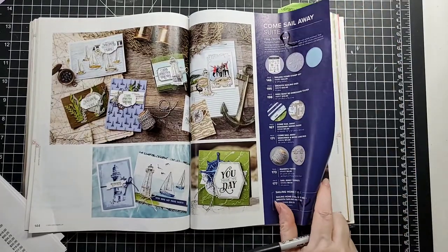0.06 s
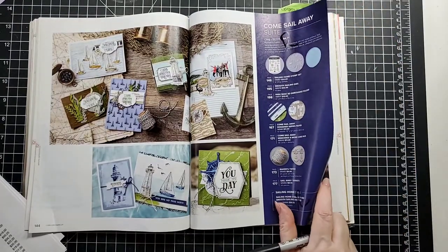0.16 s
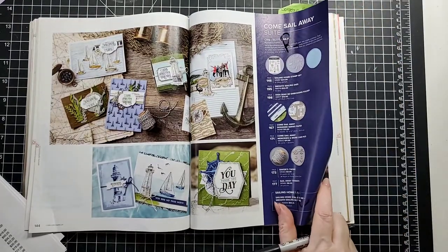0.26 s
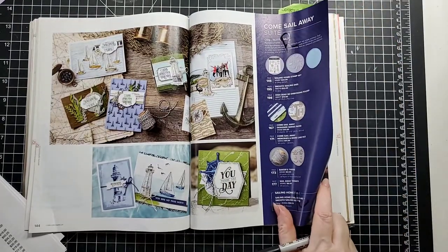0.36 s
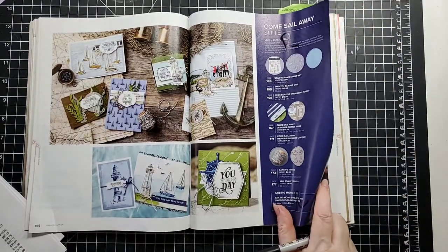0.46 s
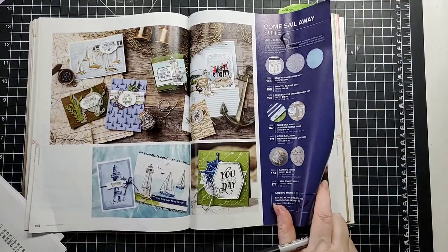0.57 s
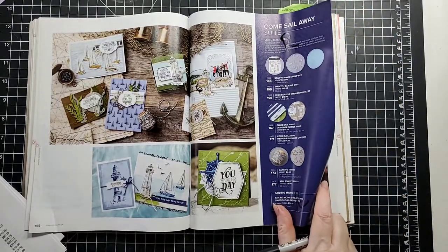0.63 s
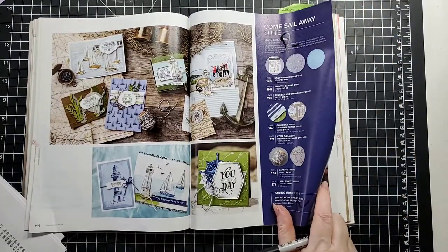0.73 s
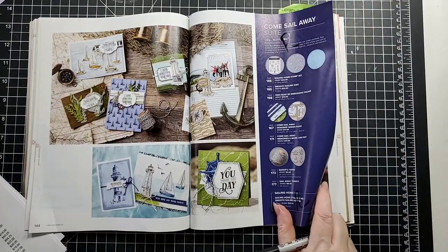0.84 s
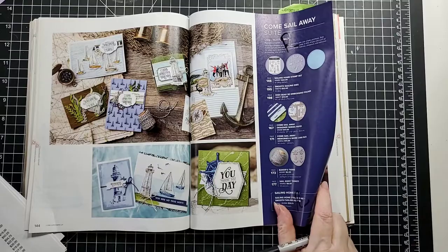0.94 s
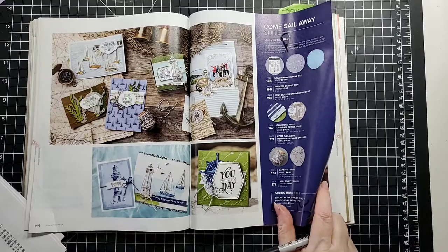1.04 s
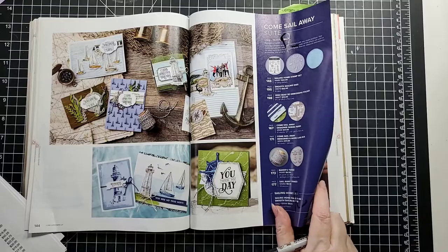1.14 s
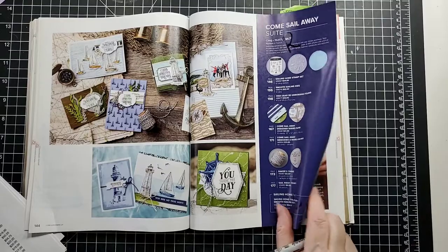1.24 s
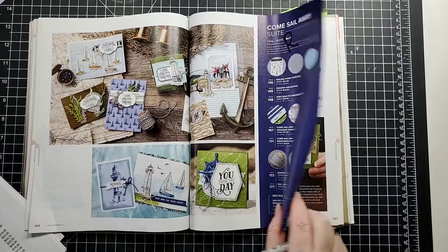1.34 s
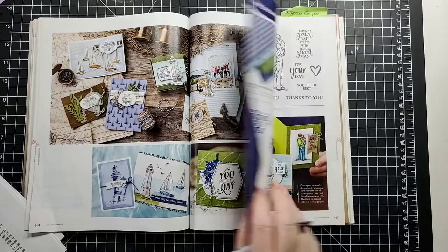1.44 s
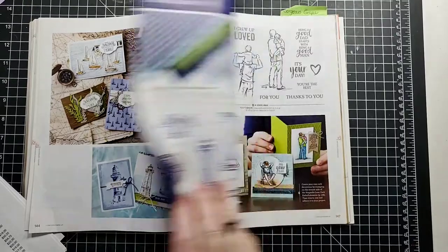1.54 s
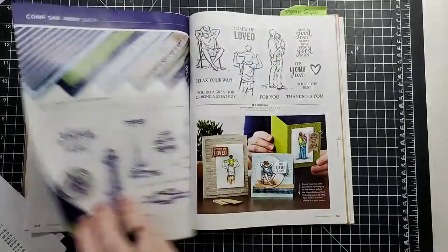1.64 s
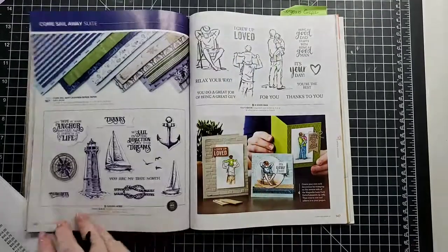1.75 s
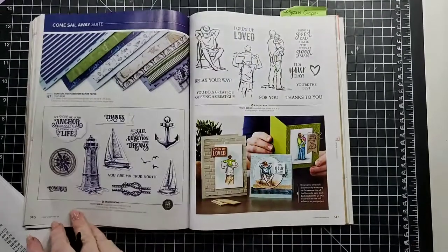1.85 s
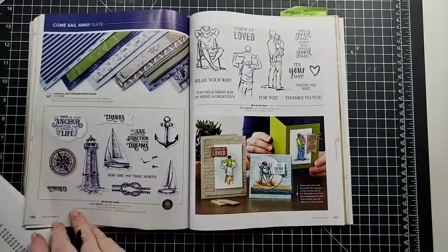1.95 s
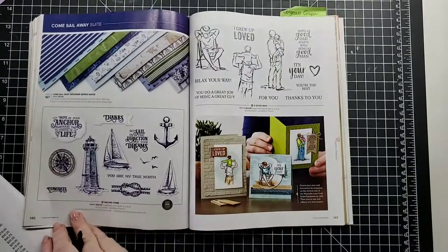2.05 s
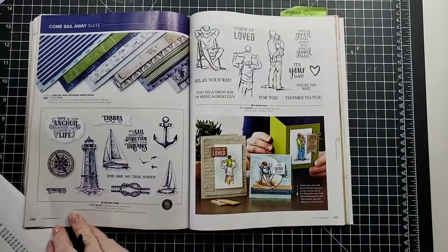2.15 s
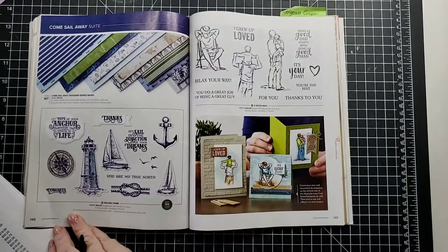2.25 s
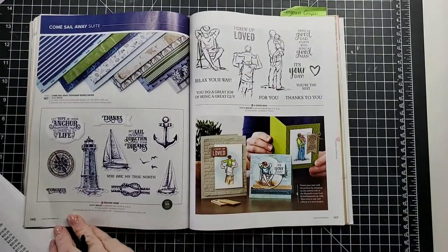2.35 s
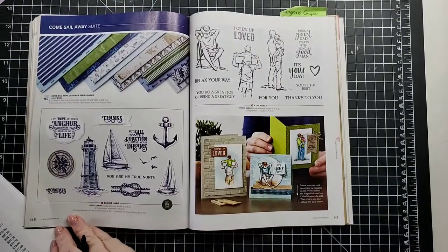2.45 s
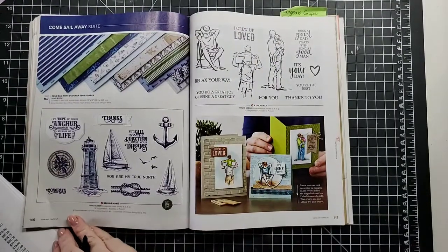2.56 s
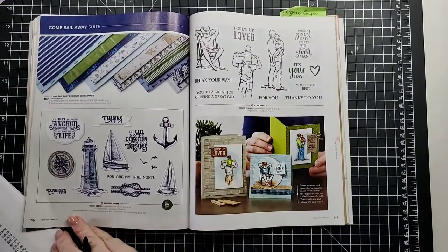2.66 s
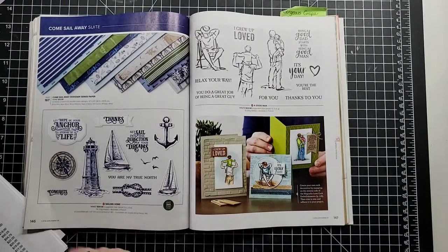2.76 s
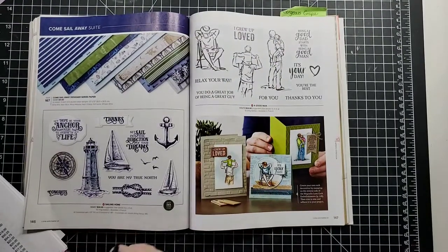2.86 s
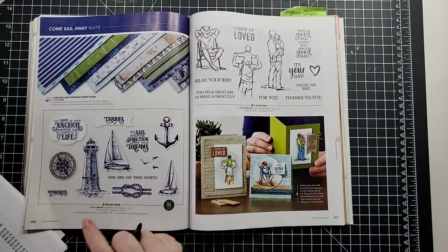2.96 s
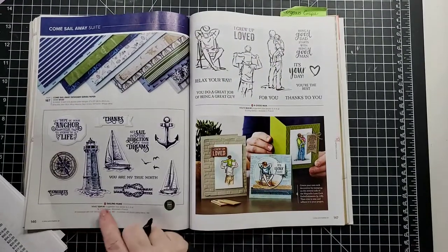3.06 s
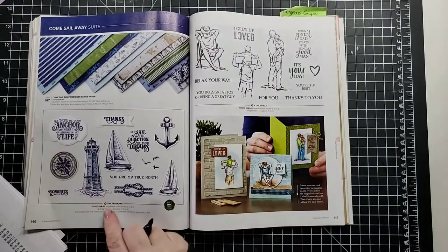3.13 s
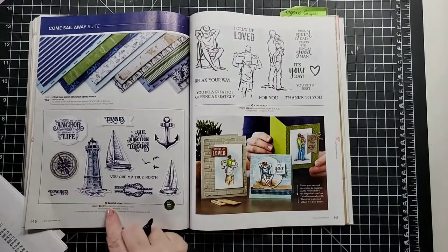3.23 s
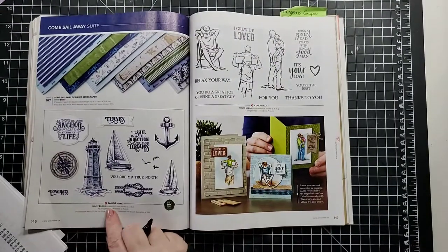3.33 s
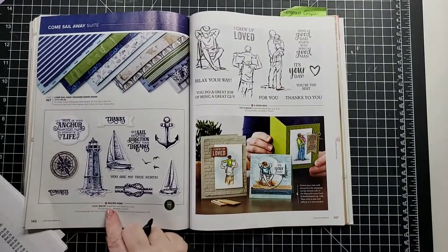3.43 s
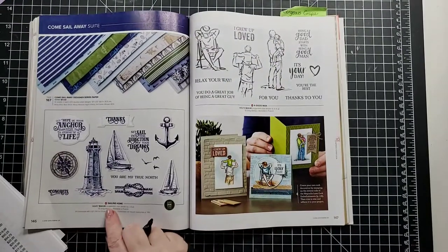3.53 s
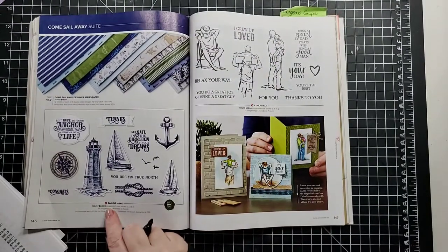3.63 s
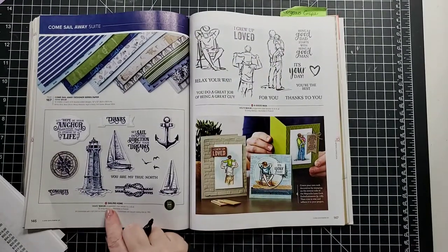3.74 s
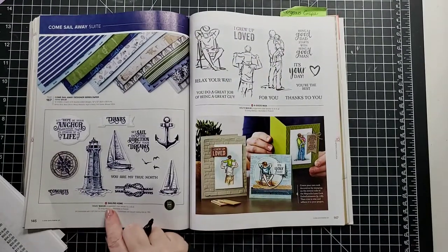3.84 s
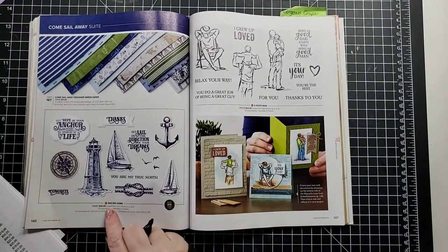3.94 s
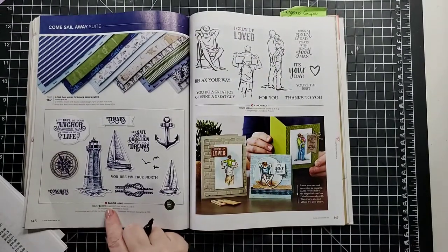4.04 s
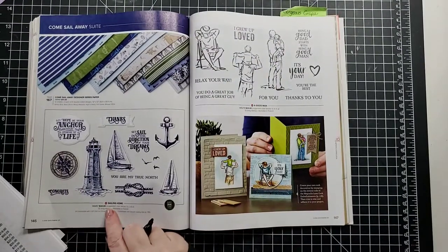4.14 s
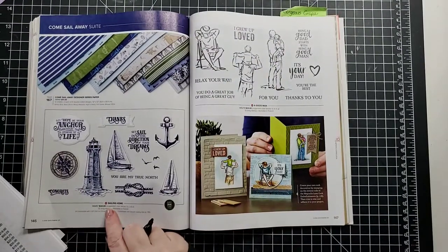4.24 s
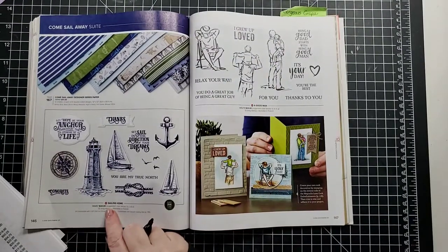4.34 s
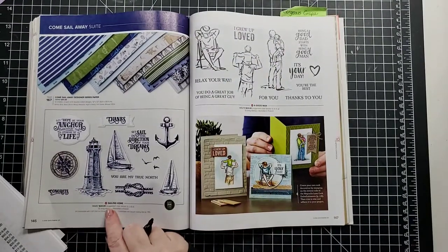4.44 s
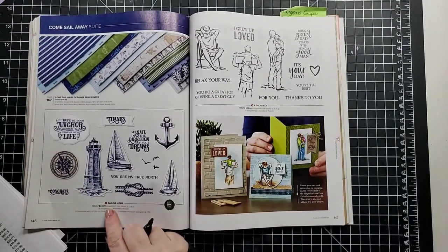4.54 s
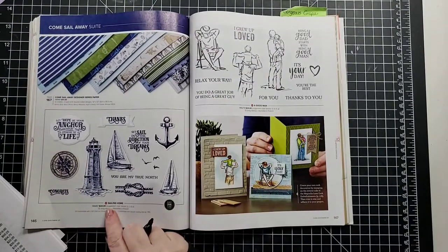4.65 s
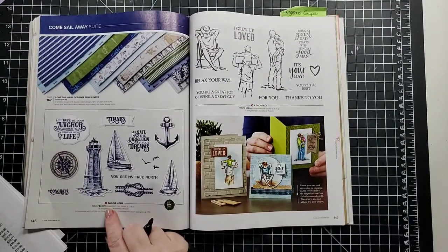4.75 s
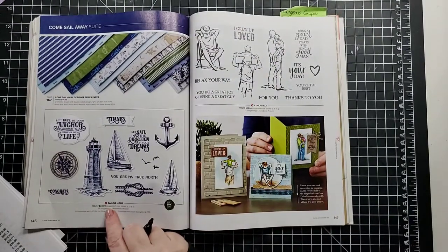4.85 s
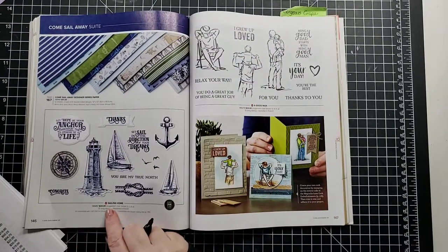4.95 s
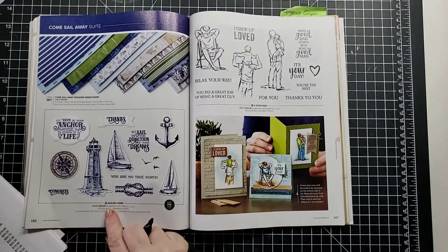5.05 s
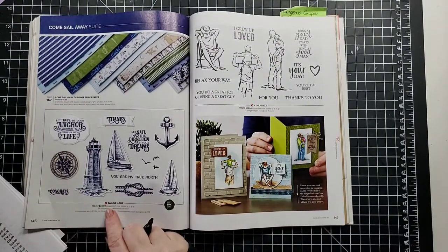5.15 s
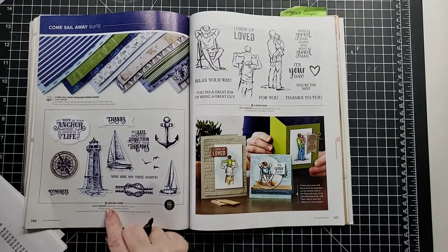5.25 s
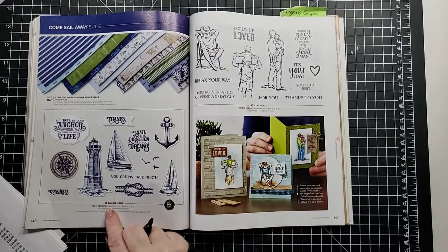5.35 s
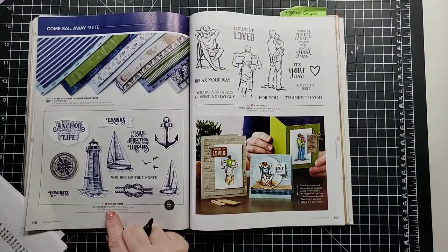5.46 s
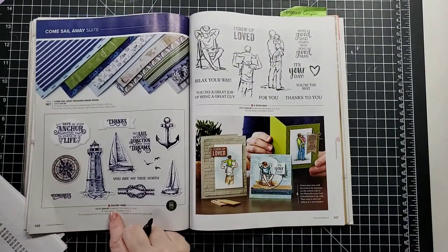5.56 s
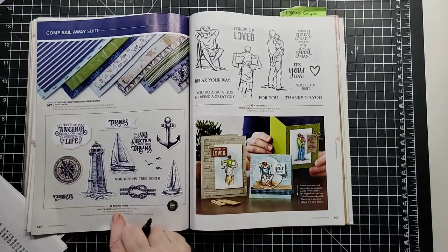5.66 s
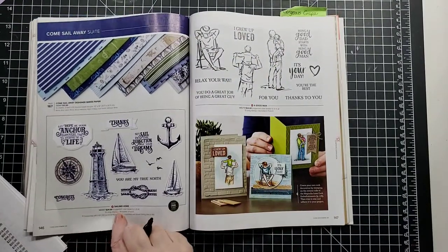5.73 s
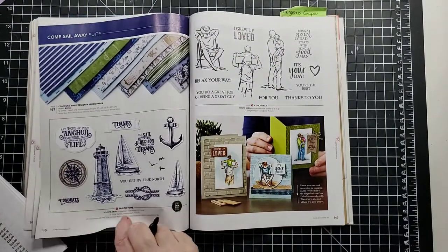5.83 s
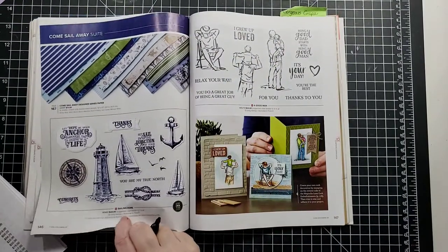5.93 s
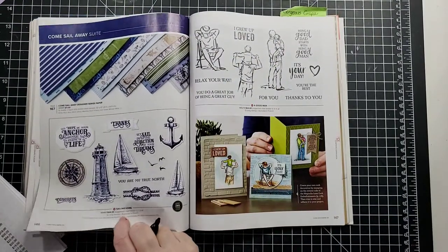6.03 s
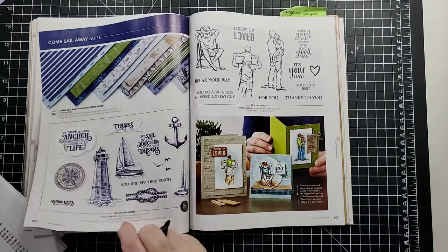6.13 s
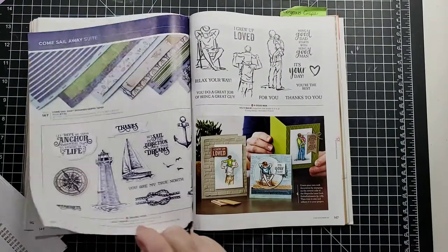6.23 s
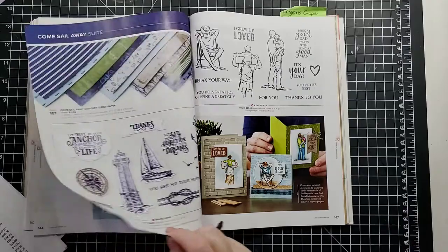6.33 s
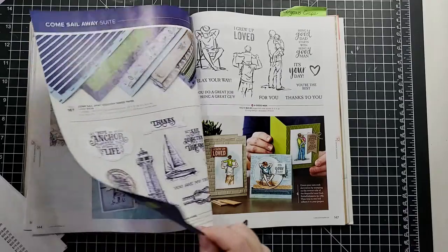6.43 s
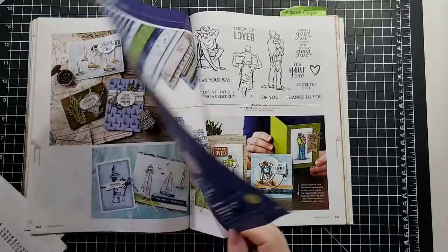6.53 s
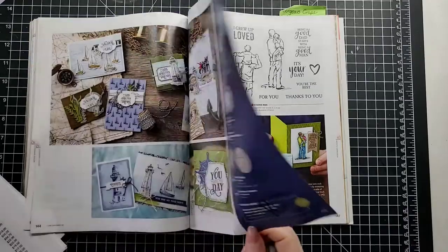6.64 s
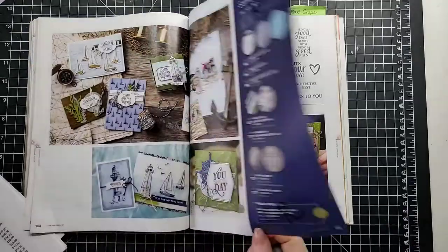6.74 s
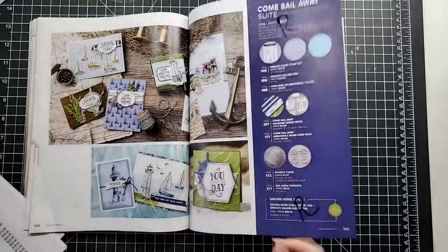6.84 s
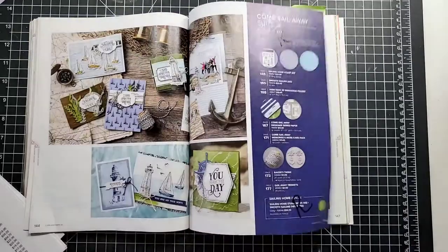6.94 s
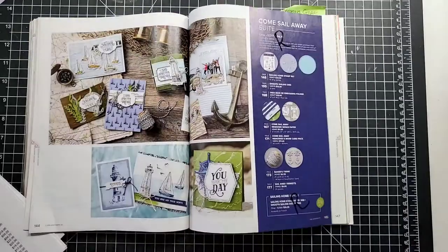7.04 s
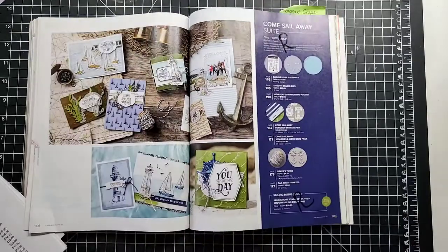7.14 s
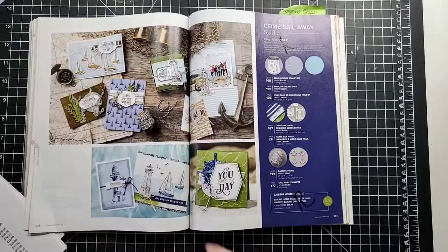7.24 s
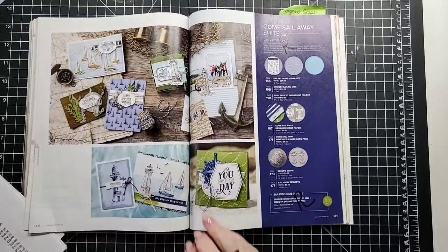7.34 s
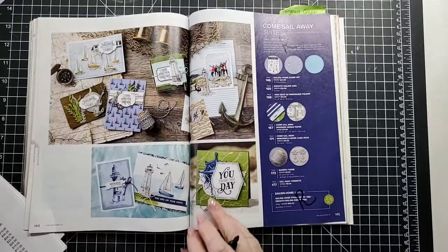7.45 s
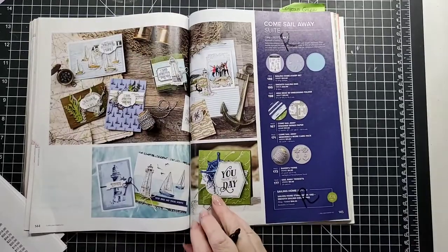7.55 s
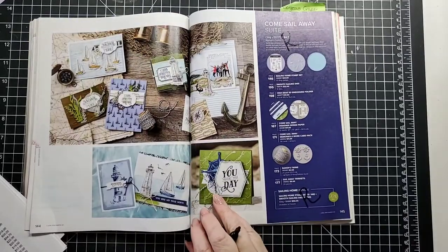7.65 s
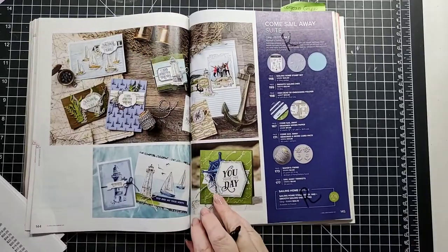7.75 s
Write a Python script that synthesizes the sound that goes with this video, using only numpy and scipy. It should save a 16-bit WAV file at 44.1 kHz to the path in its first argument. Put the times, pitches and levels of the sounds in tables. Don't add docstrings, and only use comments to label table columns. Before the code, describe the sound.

A quiet craft room, heard close from above the table in stereo, with low fan hum and gentle hiss. At 0.1 s a faint page flick; around 0.7-0.8 s a dull distant wooden rub and tiny pen-clip rattle. From 1.2 s a palm slides on glossy paper, with a tick at 1.4 s. At 1.6-1.8 s the sheet whips over: dense crackle, buckling, a gust and the loudest bright slap at 1.7 s, then quick flaps. Soft skin squeaks and smoothing at 2.0-2.1 s, small ticks and wipes from 2.5 to 3.1 s. Near silence follows, broken by a small rattle at 4.7 s. At 5.3-5.8 s fingers rub the edge, with crisp snaps at 5.7 and 5.8 s. Light rustling from 6.0 s, a sharp crack at 6.6 s, then a softer return flap landing near 6.95 s. Brushes fade by 7.5 s, ending with a faint rattle.

```python
import sys
import numpy as np
from scipy import signal
from scipy.fft import rfft, irfft, next_fast_len
from scipy.io import wavfile
from scipy.ndimage import uniform_filter1d, map_coordinates

SR = 44100
rng = np.random.default_rng(int(sys.argv[2]) if len(sys.argv) > 2 else 0)


def voltage_ratio(level):
    return 10 ** (np.asarray(level, float) / 20)


def master_out(mix):
    frames = np.transpose(np.atleast_2d(mix))
    ceiling = np.clip(frames, -1, 1)
    pcm = np.round(ceiling * 32767).astype(np.int16)
    wavfile.write(sys.argv[1], SR, pcm)


N = 343450


def evened(x):
    return x / np.sqrt(np.mean(x ** 2) + 1e-20)


def read(points, hz):
    f, value = np.transpose(points)
    return np.interp(np.log(hz + 1), np.log(f + 1), value)


def add(mix, s, sound):
    part = mix[..., round(s * SR):][..., :sound.shape[-1]]
    part += sound[..., :part.shape[-1]]


def panned(sound, pan_db):
    return sound * voltage_ratio(np.array([[.5], [-.5]]) * pan_db)


def coloured(x, gain):
    size = next_fast_len(x.shape[-1])
    return irfft(rfft(x, size) * gain(np.fft.rfftfreq(size, 1 / SR)), size)[..., :x.shape[-1]]


def resonate(x, hz, width):
    turn = np.exp(2j * np.pi * hz * np.arange(len(x)) / SR)
    r = np.exp(-np.pi * width / SR)
    return 2 * (turn * signal.lfilter([(1 - r) ** 2], [1, -2 * r, r * r], x / turn)).real


def stroke(t, s, rise, fall, bend=1):
    away = np.maximum((s - t) / max(rise, .004), (t - s) / max(fall, .004))
    return voltage_ratio(-30 * away ** np.clip(bend, .6, 3))


# (f/Hz, level/dB per Hz)
HISS_COLOUR = [(150, -31), (250, -3.5), (330, -8), (475, -12), (509, -9.5), (660, -16.5), (1600, -22.5),
               (3300, -27.5), (6960, -34), (15700, -21)]
# (f/Hz, level/dB per Hz)
RUMBLE_COLOUR = [(20, -37.5), (32, -23), (48, -6.5), (80, -13.5), (140, -14), (250, -20.5)]
# (f/Hz, width/Hz, level/dB over the air)
FAN_TONES = [(57, 6, 4.5), (117.96, 3, 12), (175.3, 11, 4.5), (456, 7, 8.5)]
# (f/Hz, correlation -1 to 1)
LIKENESS = [(60, 0.87), (180, 0.86), (550, 0.36), (1650, -0.51), (4970, 0.39), (15000, -0.99)]
# (t/s, rise and fall/s, rumble level/dB, hiss level/dB)
GUSTS = [
    (0.952, 0.41, -64.5, -92),
    (2.73, 0.16, -63.5, -81),
    (1.43, 0.24, -60, -57.5),
    (1.67, 0.16, -46.5, -65.5),
    (2.28, 0.45, -63.5, -92),
    (5.0, 1.5, -65, -92),
    (5.66, 0.58, -69.5, -67),
    (6.62, 0.44, -62.5, -67),
]


def air():
    size = next_fast_len(N)
    hz = np.fft.rfftfreq(size, 1 / SR)
    t, step = np.arange(N) / SR, np.arange(0, N / SR, .01)
    a, b, c, d = rng.standard_normal((len(hz), 4)).T
    same, left = np.clip(read(LIKENESS, hz), -1, 1), a + 1j * b
    z = np.array([left, same * left + np.sqrt(1 - same ** 2) * (c + 1j * d)])
    z *= voltage_ratio(sum(db / (1 + ((hz - f) / width) ** 4) for f, width, db in FAN_TONES))
    rumble = evened(irfft(z * voltage_ratio(read(RUMBLE_COLOUR, hz)) * (hz < 250), size)[:, :N])
    hiss = evened(irfft(z * voltage_ratio(read(HISS_COLOUR, hz)) * (hz >= 250), size)[:, :N])

    waves = (np.sin(2 * np.pi * (f * step + rng.random())) / np.sqrt(f) for f in np.geomspace(1, 6, 20))
    swell = evened(sum(waves))
    low = voltage_ratio(-68.5 + 1.5 * swell) ** 2
    high = voltage_ratio(-74.5 + 4 * np.exp(-step / 1.5)) ** 2
    for s, span, low_db, high_db in GUSTS:
        gust = stroke(step, s, span, span)
        low = low + (voltage_ratio(low_db) * gust) ** 2
        high = high + (voltage_ratio(high_db) * gust) ** 2
    return rumble * np.interp(t, step, np.sqrt(low)) + hiss * np.interp(t, step, np.sqrt(high))


# (f/Hz, width/Hz)
DRAWER_MODES = [(587, 200), (1210, 220), (2090, 110)]
# (rise/s, level/dB)
DRAWER_RUB = [(0.057, -51), (0.063, -52.5), (0.1, -54)]
DRAWER_PEAKS = (.735, .772, .765)


def drawer():
    t, out = .65 + np.arange(14000) / SR, np.zeros(N)
    for (hz, width), s, (rise, db) in zip(DRAWER_MODES, DRAWER_PEAKS, DRAWER_RUB):
        rasp = rng.standard_normal(size=len(t))
        hollow = evened(resonate(rasp, hz, width))
        scrape = evened(resonate(rasp, hz, 900.))
        add(out, t[0], voltage_ratio(db) * stroke(t, s, rise, .086) * evened(hollow + .25 * scrape))
    return out


# (t/s, level/dB)
RATTLES = [
    (0.731, -61.5),
    (0.829, -58),
    (2.898, -63),
    (3.017, -59.5),
    (4.672, -62.5),
    (4.801, -57),
    (7.719, -63.5),
]
BOUNCES = [(0, 3), (7.5, 5), (19.0, -21), (31.0, -4.5)]
CLIP_MODES = [(10050, 600, -3), (10140, 2500, 2), (7030, 1200, -4), (4670, 1040, -9), (12900, 4900, -5)]


def pen():
    t, out = np.arange(1000) / SR, np.zeros(N)
    for (s, db), puffs in zip(RATTLES, rng.standard_normal((len(RATTLES), len(BOUNCES), 1000))):
        for (ms, bounce_db), puff in zip(BOUNCES, puffs):
            puff = puff * np.minimum(t / 0.00025, 1) * np.exp(-t / 0.0022)
            tick = sum(voltage_ratio(mode_db) * evened(resonate(puff, hz, width)) for hz, width, mode_db in CLIP_MODES)
            add(out, s + ms / 1000, voltage_ratio(db + bounce_db - 13.0) * tick)
    return out


# (start t/s, end t/s, f/Hz, level/dB)
SQUEAKS = [
    (1.44, 1.525, 1080, -58.5),
    (3.005, 3.05, 1570, -73.5),
    (2.085, 2.15, 1053, -58),
    (.465, .485, 1080, -78.5),
    (2.01, 2.09, 1574, -67.5),
]


def squeaks():
    out = np.zeros(N)
    for start, end, hz, db in SQUEAKS:
        count = round((end - start) * SR)
        swell = np.linspace(0, 1, count) ** .4 * np.linspace(1, 0, count) ** .9 * 2
        tone = evened(resonate(rng.standard_normal(size=9000), hz, .1 * hz))[:count]
        add(out, start, voltage_ratio(db) * swell * tone)
    return out


# (low f/Hz, high f/Hz, share of grains heard by one port only)
LAYERS = [(420, 800, 0.34), (800, 2000, 0.55), (4200, 9300, 0.75), (9493, 12940, 0.49), (1850, 2950, 0.69),
          (829.7, 1250, .25), (4400, 7000, 0.69), (2900, 4150, 0.45), (170.03, 385, 0.12),
          (13000, 19000, .6)]
CLUMPS_DB = (2, 1.8, 1, .8, 1.8, 1.8, .8, 1.8, 2, .8)
BRIGHT_TILT = (-0.91, -0.41, .3, 1.9, -0.017, -0.62, 0.58, .1, -1.1, 1.6)
# (f/Hz, level/dB per Hz)
PAPER = [(120, -49.5), (200, -15), (365, -15), (415, -9.5), (480, -8.5), (620, -10), (816, -12.5),
         (1340, -0.5), (3710, -6), (4370, -9), (6540, -11), (8920, -26.5), (15700, -20)]
# (ten levels/dB in layer order, spread between ports 0-1, roundness)
KINDS = [(-29.5, -21.5, -7.5, -9.5, -24, -30, -2, -30, -40, -16, 0.7, 0.59),
         (-26, -8.5, -9.5, 0, -12.5, -35, -3, -21, -30, -13, 0.67, 1.08),
         (-23.5, -16, -1.5, -6, -5.5, -26, -13.5, -9, -30, -24, .95, 0.97),
         (-4, -5.5, -6, -15, 1, -4, -15, -2, -20, -32, .95, 0.9),
         (-12.5, -3, -44, -40.5, -28, -3, -45, -33.5, -25, -50, .6, 0.7),
         (2.5, -19, -50, -45.5, -30, -9.5, -50, -40, -7, -55, 0.5, 1.32)]
# (peak t/s, rise/s, fall/s, level/dB, brightness/dB)
WIPES = [
    (1.27, 0.075, 0.47, -59, 0.5),
    (1.699, 0.024, .02, -30, -2),
    (2.06, 0.084, 0.078, -59, 2),
    (2.482, 0.0039, 0.066, -71, 0.5),
    (2.662, .004, 0.11, -65.5, 3),
    (3.021, 0.15, 0.13, -63, 7.5),
    (5.828, .004, .1, -78, -14),
    (7.39, .03, 0.17, -76, 3.5),
    (7.435, 0.1, 0.1, -72.5, 5),
]
RUBS = [
    (5.53, 0.12, 0.11, -56.5, 0.5),
    (5.614, 0.13, 0.29, -53, -2.5),
    (5.72, 0.04, 0.07, -60, 1),
    (6.035, 0.019, .15, -66, -0.5),
    (6.065, 0.086, 0.22, -62, 0),
    (6.155, 0.19, 0.092, -63, 2),
    (7.018, 0.028, 0.18, -56, -2),
    (7.075, .1, .12, -63.5, 0),
    (7.133, 0.03, 0.1, -68, 0),
]
DRAGS = [(0.671, 0.12, 0.38, -75.5, 3.5), (1.11, 0.11, 0.35, -88, 8.5), (1.247, .11, 0.22, -58, 0),
         (1.4, 0.063, .4, -61.5, 0.5), (1.517, 0.46, 0.078, -61.5, 3.5), (1.645, 0.053, 0.06, -39.5, 0),
         (1.661, 0.012, 0.086, -29.5, 0.5), (1.699, 0.047, .03, -21, -8.5), (1.712, .03, .035, -27, -6),
         (1.73, .05, 0.17, -39.5, -5.5), (1.775, .008, .015, -38, 0), (1.787, 0.09, 0.02, -44, -1.5),
         (1.84, .04, 0.046, -62.5, 2), (5.775, 0.33, 0.02, -65, 3), (5.831, 0.0038, 0.28, -63.5, -3.5),
         (6.739, 0.01, 0.08, -54.5, -1), (6.8, .1, 0.028, -63.5, 5.5), (6.959, 0.0037, .1, -56.5, 3),
         (6.969, 0.012, 0.17, -53.5, -0.5)]
CRUMPLES = [(1.404, 0.03, 0.12, -59, -7.5), (1.553, 0.0084, 0.042, -49.5, -1.5),
            (1.584, 0.024, .03, -49.5, -6.5), (1.626, 0.036, 0.087, -35, 0.5), (1.662, 0.027, .06, -33, 1),
            (1.696, 0.077, 0.057, -32, 3.5), (1.83, .03, 0.24, -64.5, 5), (2.099, 0.24, 0.13, -77.5, -8.5),
            (2.479, 0.0036, 0.0098, -66, 1.5), (2.66, .006, .07, -74, -3), (6.669, 0.0065, 0.026, -48.5, 4),
            (6.088, 0.019, 0.34, -67, -1.5), (6.289, 0.032, 0.14, -62.5, 3.5),
            (6.451, 0.0076, 0.66, -67, 6.5), (6.586, 0.017, 0.18, -51, 2), (6.74, 0.015, 0.22, -62, -7)]
FLAPS = [
    (1.76, 0.13, .05, -38, 11),
    (1.778, .04, 0.043, -37, 2.5),
    (5.71, 0.01, 0.047, -57, 4),
    (0.15, 0.0054, 0.084, -75, 2),
    (6.9, 0.071, .06, -70, -1.5),
    (6.84, 0.047, 0.082, -55, -10),
    (6.86, 0.14, 0.086, -60, -15),
    (6.936, .012, 0.11, -52, 8),
    (6.964, 0.13, 0.076, -51, -9.5),
    (7.08, .15, 0.067, -63.5, -3),
]
THUDS = [
    (2.3, 0.082, 0.085, -74.5, 0.0019),
    (1.4, .05, .1, -72, 0),
    (6.46, 0.013, 0.38, -69.5, 0),
]


def handling():
    t, step = np.arange(N) / SR, np.arange(0, N / SR, .002)
    out = np.zeros((2, N))
    power = np.full((len(LAYERS), len(step)), 1e-14)
    spread = np.zeros((len(LAYERS), len(step)))
    for rows, (*fill_db, wide, bend) in zip([WIPES, RUBS, DRAGS, CRUMPLES, FLAPS, THUDS], KINDS):
        for s, rise, fall, db, bright_db in rows:
            level_db = db + np.array(fill_db) + bright_db * np.array(BRIGHT_TILT)
            part = np.outer(voltage_ratio(level_db), stroke(step, s, rise, fall, bend)) ** 2
            power, spread = power + part, spread + wide * part

    clumps = evened(uniform_filter1d(uniform_filter1d(rng.standard_normal(N), 160), 160))
    slips = rng.standard_normal(size=(3, N)) * voltage_ratio(1.0 * np.minimum(rng.exponential(size=N), 6))
    size = next_fast_len(N)
    grains, hz = rfft(slips, size), np.fft.rfftfreq(size, 1 / SR)
    layers = zip(LAYERS, np.sqrt(power), spread / power, CLUMPS_DB)
    for (lo_hz, hi_hz, apart), level, wide, lumpy_db in layers:
        edges = np.sqrt((1 + (lo_hz / (hz + 1)) ** 16) * (1 + (hz / hi_hz) ** 16))
        both, *each = evened(irfft(grains * voltage_ratio(read(PAPER, hz)) / edges, size)[:, :N])
        apart = np.clip(apart * np.interp(t, step, wide), 0, 1)
        rub = np.sqrt(1 - apart) * both + np.sqrt(apart) * np.array(each)
        out += rub * np.interp(t, step, level) * voltage_ratio(lumpy_db * clumps)
    return out


# (start t/s, end t/s, f/Hz, width/Hz, level/dB)
FLUTTERS = [(1.603, 1.64, 850, 500, -38), (1.615, 1.637, 1900, 1400, -36), (1.657, 1.725, 1300, 490, -33),
            (1.655, 1.715, 620, 270, -37), (1.77, 1.796, 1520, 700, -39), (6.818, 6.878, 990, 750, -56),
            (6.927, 6.948, 1050, 500, -43), (6.945, 6.99, 1260, 700, -44), (6.99, 7.055, 1100, 470, -59),
            (7.068, 7.11, 1460, 460, -61.5), (7.12, 7.18, 1530, 450, -72.5), (3.42, 3.54, 530, 830, -79),
            (6.596, 6.635, 2000, 1500, -51.5), (6.735, 6.77, 3500, 1500, -57),
            (5.825, 5.89, 2150, 950, -64), (.745, .82, 1490, 250, -69.5), (.715, 0.855, 1730, 150, -76.5),
            (3.006, 3.07, 1600, 1100, -74), (0.15, .17, 650, 400, -72.5), (2.3, 2.17, 1100, 550, -75),
            (6.83, 6.86, 2600, 1600, -61), (2.015, 2.11, 5600, 900, -67.5), (7.37, 7.48, 7200, 1600, -72.5),
            (2.96, 3.07, 6200, 1200, -70), (6.03, 6.11, 6900, 1100, -64.5), (7.125, 7.165, 7500, 2500, -64),
            (1.8, 1.85, 1500, 1100, -53), (6.08, 6.2, 570, 450, -68.5), (6.28, 6.36, 600, 560, -65.5),
            (5.88, 6.03, 14000, 3000, -74), (7.55, 7.7, 14000, 3500, -78), (7.38, 7.47, 14800, 2000, -75),
            (1.608, 1.636, 1200, 900, -36)]


def flutters():
    out = np.zeros(N)
    for (start, end, hz, width, db), rub in zip(FLUTTERS, rng.standard_normal((len(FLUTTERS), 7500))):
        u = np.clip(np.arange(len(rub)) / SR / max(end - start, .01), 0, 1)
        add(out, start, voltage_ratio(db) * 1.6 * u ** .3 * (1 - u) ** .5 * evened(resonate(rub, hz, width)))
    return out


# (t/s, level/dB, f/Hz, pan/dB)
CRINKLES = [(1.353, -56, 4800, -1), (1.4037, -42, 2900, -3), (1.436, -43, 3500, -3), (1.51, -50, 4800, 1),
            (1.5845, -43, 2400, -1), (1.6025, -48, 2500, 1), (1.6236, -30, 2700, 1),
            (1.6328, -31, 2600, -3), (1.68, -22, 3000, 0), (1.6872, -22, 2501, 0), (1.707, -19, 3000, 4),
            (1.712, -23, 2500, 0), (1.722, -27, 3000, 0), (1.8006, -41, 2500, 3), (1.8066, -45, 2247, 1),
            (2.122, -62, 13500, 0), (5.345, -63.5, 13500, 0), (5.385, -61, 13000, 0),
            (5.6024, -49, 5500, -2), (5.6093, -50, 5700, -2), (5.617, -48, 5500, -2),
            (6.0334, -58, 5100, -3), (6.2605, -63, 1500, 3), (6.2965, -52, 1400, 1),
            (6.6292, -44, 2700, -1), (6.6737, -42, 3000, 6), (6.6796, -50, 1300, 5), (6.716, -58, 3300, 2),
            (6.7546, -49, 3800, 1), (6.774, -53, 3200, -6.5), (6.959, -46, 2580, 1),
            (6.9575, -50, 13000, 0), (6.9932, -49, 3200, 5), (7.006, -48, 3700, 5), (7.016, -43, 3900, 3),
            (7.049, -52, 4100, 3), (7.131, -54.5, 7500, 5)]


def crinkles():
    t, out = np.arange(300) / SR, np.zeros((2, N))
    for (s, db, hz, pan_db), puff in zip(CRINKLES, rng.standard_normal((len(CRINKLES), 300))):
        kick = signal.unit_impulse(len(t)) + .4 * puff * np.exp(-t * 1000 / .5)
        pop = resonate(kick, hz, .7 * hz)
        add(out, s, panned(voltage_ratio(db) * pop / abs(pop).max(), pan_db))
    return out


# (t/s, level/dB, f/Hz, fizz level/dB over the centre, pan/dB)
BUCKLES = [(0.137, -57, 1010, -35, 2), (1.434, -53, 1290, -24, 3), (1.55, -65, 1320, -27.5, 4),
           (1.581, -35, 1000, -35.5, 2), (1.605, -37, 1146, -30.5, 9), (1.616, -19.5, 1220, -19.5, 0),
           (1.659, -21.5, 1160, -21.5, -6), (1.686, -20, 1251, -31, 2), (1.773, -23.5, 1580, -21, 1),
           (2.015, -65.5, 1432, -12, 3.5), (6.287, -47, 1068, -23, 0), (6.667, -41, 1010, -15, 3),
           (6.735, -53, 1230, -6, -1), (6.801, -61.5, 1280, -13.5, 1.5), (6.836, -49, 1183, -36.5, -1.2),
           (6.935, -36, 960, -38, 1), (6.966, -35, 1240, -19, 1), (6.972, -34.5, 1140, -15, -0.5)]
TICKS = [(0.655, -49.5, 3800, -11, 1), (1.4, -33, 3350, -29, -4), (1.698, -14, 4400, -33, 5.5),
         (2.478, -43, 5970, -3.5, 3.5), (2.657, -47, 4620, -3, 4), (3.041, -44, 5810, 0, 6),
         (3.113, -52.5, 5720, -7, 6), (5.33, -58, 5433, 3.5, 6), (6.083, -45.5, 2230, -20.5, 9.5),
         (6.45, -47.5, 3560, -8, 1.5), (6.736, -50, 3000, -15, 1)]
# (length/ms, width over centre, lower ring share, its width over centre, crackle share)
SNAP_KINDS = [(2.1, 0.5, 0.25, .35, 0.31), (1.5, .8, 0.28, 0.23, .15)]
# (f/Hz, width/Hz, level/dB)
HOUSING_DIP = (8200, 750, -5.5)


def snaps():
    t, out = np.arange(1400) / SR, np.zeros((2, N))
    for rows, (ms, wide, lower, lower_wide, crackle) in zip([BUCKLES, TICKS], SNAP_KINDS):
        for (s, db, hz, fizz_db, pan_db), trail in zip(rows, rng.standard_normal((len(rows), 1400))):
            trail = crackle * trail * np.minimum(t / 0.0003, 1) * np.exp(-t * 1000 / max(ms, .2))
            burst = trail + signal.unit_impulse(len(t), 20)
            body = resonate(burst, hz, wide * hz) + lower * resonate(burst, 0.54 * hz, lower_wide * hz)
            fizz = resonate(burst, 12800., 4400.0)
            sound = body / abs(body).max() + voltage_ratio(fizz_db) * fizz / abs(fizz).max()
            add(out, s, panned(voltage_ratio(db) * sound, pan_db))
    centre_hz, width, dip_db = HOUSING_DIP

    def radiation(hz):
        dip = voltage_ratio(dip_db / (1 + ((hz - centre_hz) / width) ** 2))
        return dip / np.sqrt(1 + (450 / (hz + 1)) ** 6)

    return coloured(out, radiation)


# (t/s, f/Hz, width/Hz, level/dB, pan/dB)
CRACKS = [(0.138, 2700, 500, -64, 2), (1.6595, 7000, 3500, -22, -3), (1.6605, 3000, 2000, -24, -3),
          (1.774, 6200, 2500, -30, 0), (6.6445, 5003, 4002, -48, 0), (6.9345, 1000, 250, -37.5, -2),
          (6.949, 1250, 300, -38, 0), (6.97, 3000, 800, -41.5, -0.5), (6.842, 2200, 1500, -48, 0),
          (1.699, 2732, 499.7, -16, .5), (5.6988, 12130, 1210, -23.5, 4.5), (5.699, 14700, 1200, -31, 6),
          (5.6994, 5160, 900, -26, 10.5), (5.6996, 6420, 650, -25.5, 4), (5.6995, 1500, 350, -40, 2),
          (5.8209, 5670, 1300, -26.5, -6), (5.821, 4010, 650, -30.5, -8.5), (5.8215, 2310, 598, -38.5, -4),
          (5.822, 1500, 400, -41.5, 0), (6.5767, 5630, 1503, -25, -10.5), (6.5778, 4200, 1100, -24, -10),
          (6.5779, 3130, 600, -23, -6), (6.578, 2300, 600, -28, -5), (6.5786, 1410, 400, -38.5, -4),
          (6.578, 8600, 1500, -34, -10.5), (6.5775, 12800, 3000, -38, -7), (6.5915, 2300, 1200, -35, -4)]
SLAP = [
    (1.6975, 4360, 410, -13, .5),
    (1.698, 6400, 500, -18, .5),
    (1.6975, 5000, 500, -24, .5),
    (1.697, 1300, 350, -20, .5),
    (1.6935, 3500, 5000, -13, 0),
    (1.7028, 2800, 3500, -14, 5),
]


def cracks(rows):
    out = np.zeros((2, N))
    for s, hz, width, db, pan_db in rows:
        ring = resonate(signal.unit_impulse(600), hz, width)
        add(out, s, panned(voltage_ratio(db) * ring / abs(ring).max(), pan_db))
    return out


# (t/s, delay/samples)
HAND = [(1.0, -3), (1.2, -1), (1.4, 0.3), (1.5, 3), (1.56, 6), (2.2, 6), (2.45, 12.5), (2.7, 12),
        (2.9, 5.5), (6.3, 6.5), (6.5, 4), (6.7, .3), (6.85, 2), (7.1, 3), (7.4, 4)]


def delayed(right):
    s, late = np.transpose(HAND)
    n = np.arange(N)
    return map_coordinates(right, [n - np.interp(n / SR, s, late)], order=3)


# (f/Hz, t60/s)
WALLS = [(250, 0.459), (1000, 0.28), (3000, 0.17), (8000, 0.12), (15000, 0.27)]
# (t/ms, level/dB)
ECHOES = [(1.4, -7.5), (3.1, -14), (9.4, -12), (13.5, -20.5), (21.0, -25)]


def room(x):
    taps = np.zeros((2, SR // 2))
    at = np.arange(300, SR // 2 - 20, 20)
    at = at + rng.integers(0, 20, (2, len(at)))
    np.put_along_axis(taps, at, rng.choice([-1., 1.], at.shape), 1)
    hz, t, z = signal.stft(taps, SR, nperseg=256)
    tail = signal.istft(z * voltage_ratio(-60 * t / read(WALLS, hz)[:, None]), SR, nperseg=256)[1]
    tail /= np.linalg.norm(tail[0])
    for ms, db in ECHOES:
        tail[[0, 1], round(ms * SR / 1000) + rng.integers(0, 12, 2)] += voltage_ratio(db + 3.0)
    return signal.fftconvolve(x[None], tail, axes=1)[:, :N]


# (start t/s, end t/s, low f/Hz, high f/Hz, level/dB)
HOLLOWS = [
    (2.965, 3.06, 3350, 8850, -22),
    (3.06, 3.14, 3500, 8000, -14),
    (5.455, 5.545, 3300, 9300, -36),
    (5.567, 5.694, 3800, 9100, -36),
    (5.717, 5.815, 3850, 9400, -13),
    (5.97, 6.015, 3900, 8100, -18),
    (6.985, 7.03, 8300, 12000, -25),
    (7.125, 7.2, 3200, 8900, -18),
]


def hollowed(x):
    out, width = x.copy(), 300
    for start, end, lo_hz, hi_hz, db in HOLLOWS:
        part = x[:, round(start * SR):round(end * SR)]

        def notches(hz):
            low = db / (1 + ((hz - lo_hz) / width) ** 8)
            high = db / (1 + ((hz - hi_hz) / width) ** 4)
            return voltage_ratio(low + high)

        add(out, start, (coloured(part, notches) - part) * signal.windows.tukey(part.shape[1], .1))
    return out


def scene():
    soft = handling() + squeaks() + snaps() + flutters()
    sharp = cracks(CRACKS) + crinkles()
    slap = cracks(SLAP)
    near = soft + sharp
    paper = np.array([near[0], delayed(near[1])]) + slap
    far = pen() + drawer()
    wet = voltage_ratio(-11.0) * soft.mean(0) + voltage_ratio(-16) * (sharp + slap).mean(0) + voltage_ratio(-10.5) * far
    return hollowed(voltage_ratio(-2.0) * paper + voltage_ratio(-35.0) * far + room(wet) + air())


def roll_off(x):
    return signal.sosfilt(signal.butter(12, 16500, fs=SR, output="sos"), x)


# (f/Hz, left over right level/dB)
PORTS = [(60, -4.0), (200, -5.5), (500, -1.5), (2400, 0.5), (6000, -1.06), (10000, -0.35), (14000, 12)]


def record(dry):
    def port_gain(hz):
        top_db = -30 * np.clip((hz - 15650) / 150, 0, 1)
        return voltage_ratio(np.outer([.5, -.5], read(PORTS, hz)) + top_db)

    return roll_off(coloured(dry, port_gain))


dry = scene()
out = record(dry)
master_out(out)
```